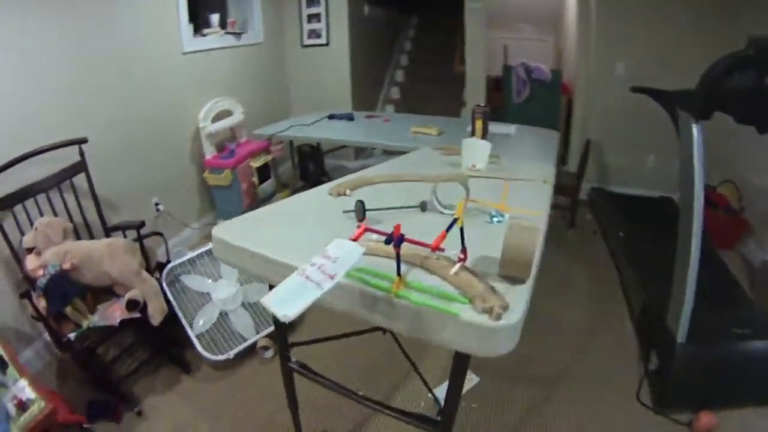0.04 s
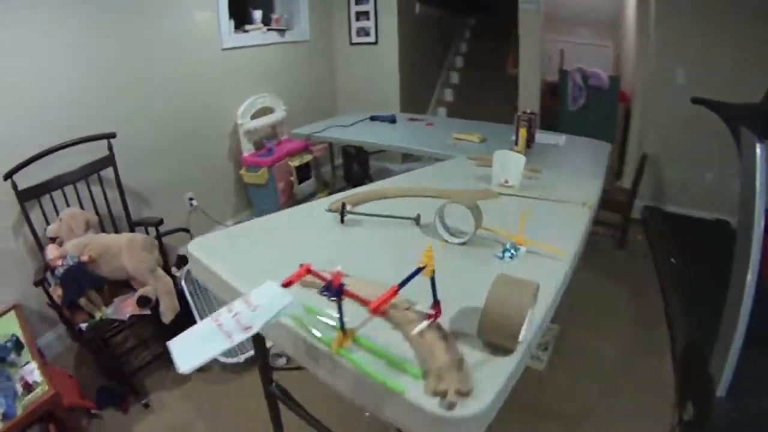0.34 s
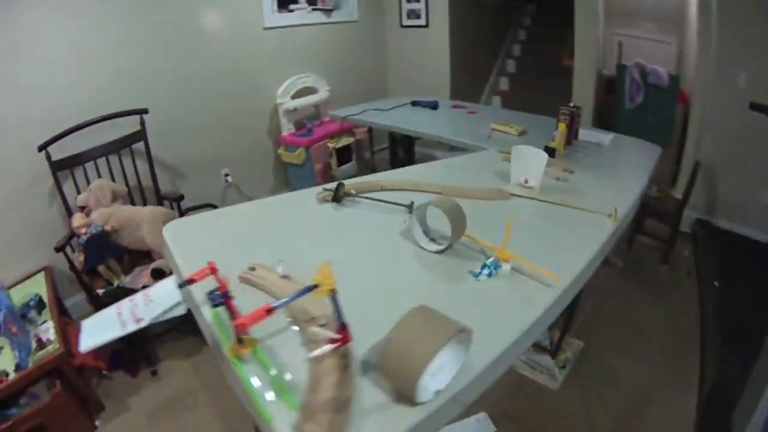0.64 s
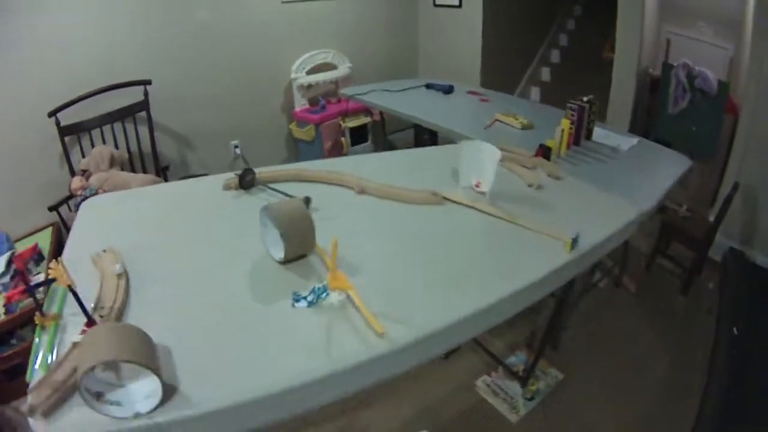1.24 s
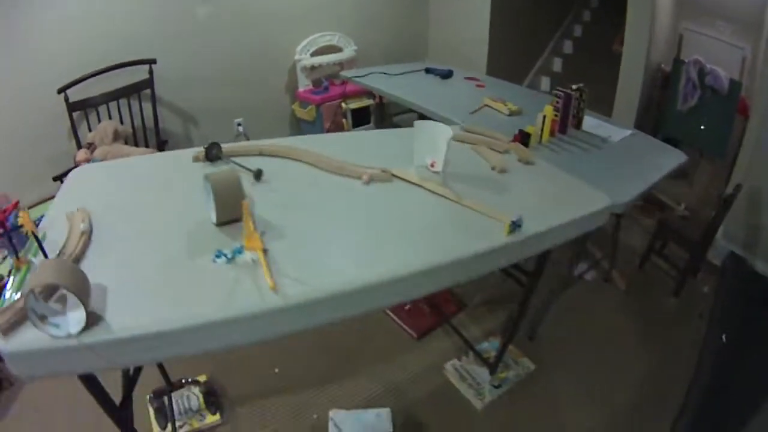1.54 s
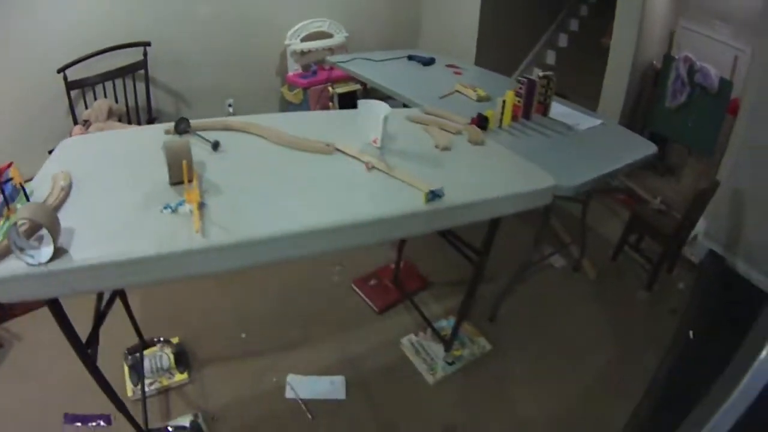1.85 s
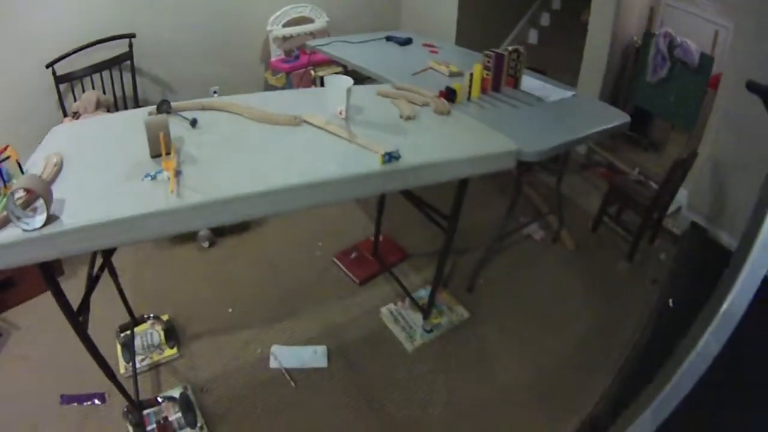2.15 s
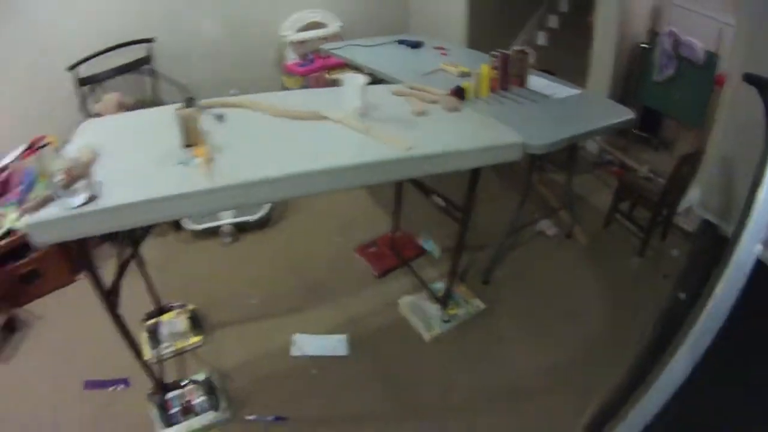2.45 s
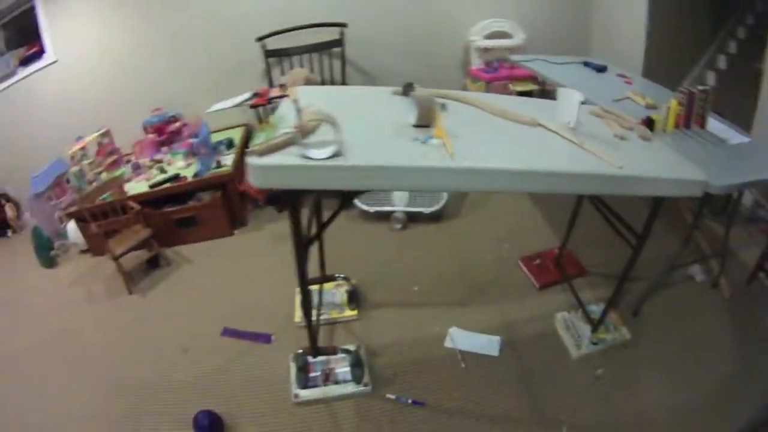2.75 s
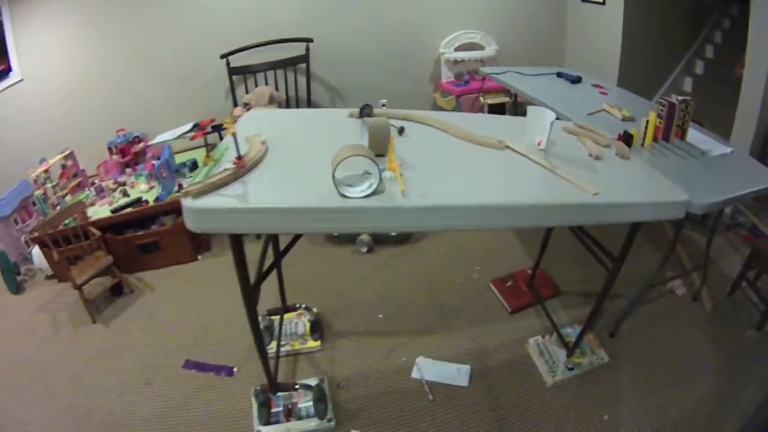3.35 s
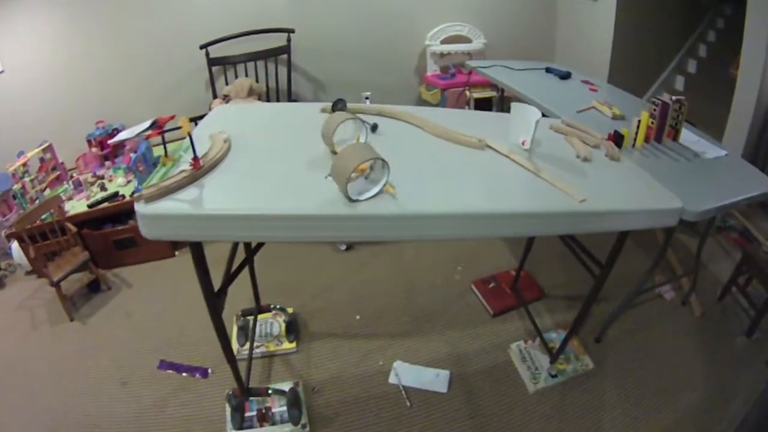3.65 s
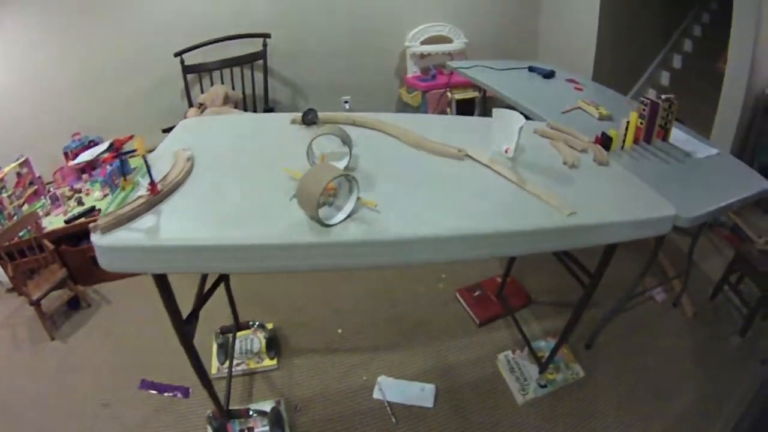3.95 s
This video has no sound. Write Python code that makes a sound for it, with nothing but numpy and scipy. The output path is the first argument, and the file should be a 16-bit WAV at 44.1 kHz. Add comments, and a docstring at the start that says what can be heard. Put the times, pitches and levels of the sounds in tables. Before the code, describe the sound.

Rolls of packing tape rumble over a hollow plastic table from the start, with many small bumps and dry ticks. At about 2.2 seconds one hits plastic sticks with a sharp click, and the rolling dies away. Soft thuds, probably footsteps, come at 2.7 and faintly at 3.2 seconds. From 3.4 seconds two rolls knock lightly together and wobble, settling near 4 seconds over a faint room hush.

```python
"""You hear rolls of packing tape rumble and bump over a hollow plastic folding table in a quiet room.
One runs into plastic sticks with a sharp click and stops; soft thuds, probably footsteps, follow.
Then one roll knocks against the other and wobbles to rest.
The rumble is countless tiny hits of a cardboard rim, which make the tabletop and the roll's core ring.
Each bump, knock, click and thud is one short blow, shaped by the thing it strikes."""
import sys
import numpy as np
from scipy import signal
from scipy.fft import rfft, irfft
from scipy.io import wavfile

SR = 44100
rng = np.random.default_rng(int(sys.argv[2]) if len(sys.argv) > 2 else 0)


def to_wav(s):
    """Save 16-bit WAV."""
    ch = np.atleast_2d(s).T  # columns
    pcm = np.round(np.clip(ch, -1, 1) * 32767)  # PCM
    wavfile.write(sys.argv[1], SR, pcm.astype(np.int16))


N = 176400  # 4 seconds

# Levels in the tables are relative: most layers add an overall gain of their own.
# three stretches of rolling: time_s, level_db, bass_db, contact_hz, contact_db
ROLL_PATH = [
    [(0.0, -28, -38, 1086, -42.5), (0.03, -35.5, -37.5, 1050, -7.5), (0.098, -31, -39.5, 1300, -12),
     (0.188, -26.5, -46, 997, 3.5), (0.232, -32, -42.5, 1130, 3), (0.312, -22, -35, 1310, -16),
     (0.326, -22, -40, 1280, -2.5), (0.354, -23.5, -28.5, 1187, -4.5), (0.404, -29.5, -41, 1325, 9),
     (0.448, -41, -28, 1215, 9), (0.456, -27.5, -38.5, 1135, -12), (0.52, -24, -36.5, 1136, 1),
     (0.562, -22, -29.5, 1020, -26), (0.596, -27.5, -31, 1037, 9), (0.66, -29.5, -51.5, 886, -5)],
    [(0.68, -26, -47, 997, 0.5), (0.71, -21.5, -42, 1034, -19), (0.76, -22, -37, 890, -3),
     (0.896, -25.5, -49.5, 1003, -10), (0.942, -25, -45.5, 1190, -7), (1.01, -23, -43.5, 920, -5),
     (1.154, -21, -46, 1310, -16.5), (1.204, -21.5, -38, 1050, -14), (1.316, -26.5, -67.5, 1116, 4),
     (1.37, -28.5, -51, 1375, 9.5), (1.464, -39.5, -67.5, 1520, 6.5), (1.476, -22, -71, 1390, -5.5),
     (1.724, -25.5, -41, 1110, 5), (1.788, -37.5, -33, 1160, 6), (1.798, -59, -40, 1050, -2)],
    [(1.8, -17.5, -40, 1350, -6.5), (1.816, -20, -53, 1370, -21.5), (1.858, -28.5, -41, 1046, 8.5),
     (1.892, -29, -52, 1010, 4), (1.918, -23, -32.5, 985, -1.5), (1.978, -28, -51, 850, 4.5),
     (2.018, -29.5, -50, 1040, -6), (2.066, -24, -55, 923, -5), (2.12, -29.5, -68, 980, 6),
     (2.202, -27, -62, 1400, -3.5), (2.27, -29.5, -39.5, 996, 2), (2.298, -25, -43, 904, -1),
     (2.346, -40, -55, 970, 6.5), (2.416, -53.5, -57, 1003, -4.5), (2.46, -58, -75, 1143, -1)],
]
# the hollow note of the cardboard core: time_s, level_db, pitch_hz
CORE_NOTE = [(1.021, -45, 1156), (1.079, -35, 1180), (1.25, -37, 1230), (1.41, -37.5, 1380),
             (1.46, -29.5, 1360), (1.57, -37.5, 1265), (1.63, -29.5, 1025), (1.709, -27, 995),
             (1.779, -44.5, 893), (1.89, -32.5, 944), (1.959, -32, 930), (2.031, -63, 857)]
# the rim bumping the table: start_s, level_db, contact_hz, contact_db, tick_db
RIM_BUMPS = [(0.062, -23.5, 925, -17, -57), (0.091, -21.5, 1370, 7, -53), (0.12, -17.5, 950, 8, -65),
             (0.149, -25, 1380, 8, -70), (0.179, -37, 1000, 10, -74), (0.205, -24.5, 1170, 5, -58),
             (0.234, -27.5, 939, 14.5, -42.5), (0.257, -19.5, 965, 11, -50), (0.281, -17, 1270, 9, -50),
             (0.326, -15.5, 1390, 13, -37), (0.344, -36.5, 1270, -9.5, -68), (0.372, -15.5, 980, -15, -61),
             (0.39, -19, 670, -15, -40), (0.435, -18.5, 1450, 2, -42), (0.453, -11, 1200, 1, -52),
             (0.459, -14.5, 1220, -16.5, -48), (0.478, -13.5, 1260, -5, -49), (0.556, -13.5, 850, 4, -50),
             (0.579, -20, 972, -4, -44), (0.802, -20.5, 708, -13, -54), (0.935, -17.5, 1330, -23, -46.5),
             (1.137, -15, 1640, 0.5, -40.5), (1.317, -17.5, 730, -1, -37),
             (1.407, -13.5, 1460, 19.5, -33.5), (1.439, -11, 1354, 40.5, -34), (1.464, -23, 1390, 8.5, -50),
             (1.657, -20.5, 1020, 11, -39.5), (1.692, -24, 1010, 1, -54), (1.707, -28, 960, 14, -43.5),
             (1.801, -17.5, 1550, 7, -34), (1.818, -11, 1580, 5, -42.5), (1.981, -18, 894, 1, -67),
             (2.041, -20.5, 910, 12, -63), (2.18, -20.5, 1490, 12, -49), (2.187, -18.5, 1440, 0, -41),
             (2.207, -20, 1530, -7, -56), (2.225, -20, 870, 5, -52)]
# roll knocking against roll: start_s, level_db, contact_hz
ROLL_KNOCKS = [(3.446, -26, 1500), (3.458, -27.5, 1700), (3.47, -26, 930), (3.515, -22, 660),
               (3.524, -25, 1000), (3.554, -25, 670), (3.587, -27.5, 657), (3.624, -29, 675),
               (3.65, -28.5, 1090), (3.661, -27, 1150), (3.698, -33, 890), (3.753, -22, 680),
               (3.781, -29, 640), (3.812, -54, 660)]
# the rolls rocking and rubbing after they meet: time_s, level_db
ROCKING_LEVELS = [(3.443, -30), (3.512, -44), (3.519, -31), (3.57, -44.5), (3.748, -41), (3.752, -45.5),
                  (4.0, -52)]
RUB_LEVELS = [(3.45, -70), (3.55, -77), (3.8, -91), (3.91, -59), (4.0, -62)]
# bright ticks of the rolls bumping and knocking, and plastic sticks struck near 2.2 s:
# start_s, level_db, snap_hz
SHARP_CLICKS = [(0.22, -50, 4400), (0.236, -48, 4300), (0.942, -56, 8500), (1.303, -52.5, 9500),
                (1.442, -50, 4020), (1.753, -44, 3580), (1.801, -43, 3920), (2.1891, -26.5, 6300),
                (2.202, -42, 7400), (2.207, -38, 4900), (2.2787, -38.5, 5240), (2.309, -52, 4600),
                (3.4476, -48, 4300), (3.6588, -54.5, 9100)]
# soft thuds: start_s, level_db, slap_db, boom_top_hz
SOFT_THUDS = [(2.670, -24, 0, 900), (2.679, -27, 2.5, 800), (2.717, -18, 3, 900), (3.174, -32.5, -11, 393)]

# the notes (modes) a struck thing rings with, and their time to fade 60 dB: pitch_hz, level_db, fade_s
TABLE_MODES = [(216, -11.5, 0.35), (248, -5, .11), (504, -15.5, 0.024), (558.7, -6.5, 0.12),
               (680.5, 0.5, 0.14), (921.5, -2, 0.091), (1050, -5, .04), (1223, 0.5, .14),
               (1242, -14.5, 0.063), (1380, -3, 0.14), (1502, -11, 0.25)]
CLICK_MODES = [(4750, -6, .17), (4850, -3, .17), (4930, 2.5, .18), (5080, -1, .17), (5200, -10, .13),
               (5997, -9, .13), (6400, -8.5, .11), (6551, -7.5, .12), (6780, -3, .12), (7811, -15.5, .06)]
THUD_MODES = [(251, 1, 0.16), (328, -5, 0.12), (437, -5, 0.11), (546, -7, 0.13)]

# how strong each sound is from low to high: pitch_hz, level_db
TABLETOP_TONE = [(30, -50), (100, -49.5), (200, -15), (330, -15), (460, -1), (680, -3), (920, -1),
                 (1250, -3.5), (1580, -1.5), (1960, -6.5), (2400, -22), (3050, -37), (3700, -48.5),
                 (4300, -43), (5200, -67), (8000, -76), (15000, -77.5), (20000, -74)]
RUMBLE_TONE = [(50, -34), (110, -34), (200, -3), (260, -5.5), (380, -6.5), (600, -41), (1500, -11.5),
               (6000, -70)]
RIM_SCRAPE_TONE = [(100, -61.5), (1500, -27.5), (2600, 14.5), (3600, 1), (4250, 2.5), (4700, -17.5),
                   (5200, -7.5), (8000, -19), (15000, -32.5)]
DRY_TICK_TONE = [(100, -77.5), (1200, -33), (1900, 26.5), (2400, 10.5), (3000, 2.5), (3700, -6.5),
                 (4300, -6), (5200, -23.5), (8000, -29.5), (15000, -41)]
WOBBLE_TONE = [(30, -63), (70, -23), (130, -27), (210, -3), (350, -18.5), (470, -3.5), (650, -4.5),
               (800, -8), (1100, -4), (1900, -16.5), (2500, -31.5), (4000, -45.5), (8000, -60),
               (16000, -70)]
SNAP_TONE = [(50, -71), (800, -32), (2500, 0), (4000, 0), (5000, -0.5), (6700, -4.5), (7700, -12),
             (11000, -11.5), (12000, -22.5), (13400, -10), (14500, -23.5)]
THUD_BOOM_TONE = [(20, -60), (40, -49), (120, -29), (190, -0.5), (250, 1.5), (330, 1), (440, 5), (550, 3.5),
                  (680, -8.5), (900, -32), (3000, -55), (9000, -88)]
THUD_SLAP_TONE = [(30, -52), (200, -37), (700, 5), (1100, 8), (1550, 10.5), (2000, -3), (2600, -37),
                  (5000, -55), (12000, -72)]
ROOM_NOISE_TONE = [(20, -47.5), (50, -30), (80, -26.5), (105, -8.5), (150, -8.5), (200, -10), (330, -1.5),
                   (480, -7), (750, -6.5), (1100, -9.5), (1500, -7), (1900, -15), (2400, -24.5),
                   (3100, -28.5), (4200, -31), (7000, -32.5), (11000, -35), (15000, -36)]
# how long the room's echo takes to fade 60 dB: pitch_hz, fade_s
ECHO_FADES = [(150, 0.5), (400, 0.37), (1000, 0.13), (2500, 0.21), (6000, 0.22), (14000, 0.23)]

HIT_S = 0.25  # length of one hit
TIME = np.arange(N) / SR


def rolling():
    """Tiny hits shake the tabletop; the uneven rim adds a low rumble, a stiffer contact a fine scrape."""
    times, *columns = np.vstack(ROLL_PATH).T
    db, bass_db, hz, contact_db = (np.interp(TIME, times, column) for column in columns)
    body = tabletop(grains(), TABLETOP_TONE, hz, contact_db, moving=True) * amp(db - 5)
    rumble = unit(colour(grains(), RUMBLE_TONE)) * amp(bass_db - 8.5)
    stiffness_db = 11 * np.log2(hz / hz.mean())  # a higher contact note scrapes louder
    scrape = unit(colour(grains(), RIM_SCRAPE_TONE)) * amp(db + stiffness_db - 38.5)
    return (body + rumble + scrape) * (TIME < times[-1])


def tabletop(force, tone, contact_hz, contact_db, width_hz=1065, moving=False):
    """The table answers a force with a broad sound, a note from the springy contact and its own ring."""
    body = unit(colour(force, tone))
    contact = resonate(resonate(body, contact_hz, width_hz), contact_hz, width_hz)
    # the ring keeps changing under a moving roll
    ringing = drift(body, lambda x: ring(x, TABLE_MODES)) if moving else ring(body, TABLE_MODES)
    return unit(body + amp(contact_db) * unit(contact) + amp(-5) * unit(ringing))


def grains(per_second=1800, clump_hz=41.3):
    """A cardboard rim makes countless tiny hits on a textured surface, in slight clumps."""
    sizes = amp(1.5 * np.minimum(rng.exponential(1, N), 4))
    hz = np.fft.rfftfreq(N, 1 / SR)
    clumps = unit(irfft(rfft(rng.standard_normal(N)) * hz * np.exp(-hz / clump_hz), N))
    hits = rng.choice([-1, 1], N) * (rng.random(N) < per_second / SR)
    return unit(sizes * amp(0.22 * clumps) * hits)


def cardboard_core(width_hz=190):
    """Tiny hits sound the hollow core, whose note rises a little, then sinks as the roll slows."""
    times, db, hz = np.transpose(CORE_NOTE)
    hz = np.interp(TIME, times, hz)
    note = resonate(resonate(grains(), hz, width_hz), hz, width_hz)
    return unit(note) * amp(np.interp(TIME, times, db) - 1) * fade(times)


def rim_bumps():
    """Flat spots and edges of the rim strike the table, each with a small dry tick."""
    out = np.zeros(N)
    for start, db, hz, contact_db, tick_db in RIM_BUMPS:
        bump = tabletop(blow(scatter_s=0.0085, scatter_db=8.5), TABLETOP_TONE, hz, contact_db)
        tick = colour(blow(scatter_s=0.0064, scatter_db=37), DRY_TICK_TONE)
        add(out, start, db - 10, bump)
        add(out, start, tick_db + 0.5, tick)
    return out


def wobble():
    """The rolls rock on the table and knock together with faint cardboard ticks."""
    times, levels = np.transpose(ROCKING_LEVELS)
    out = unit(colour(grains(), WOBBLE_TONE)) * amp(np.interp(TIME, times, levels) - 4) * fade(times)
    for start, db, hz in ROLL_KNOCKS:
        force = blow(scatter_s=0.011, scatter_db=28)
        knock = tabletop(force, WOBBLE_TONE, hz, contact_db=2.5, width_hz=670)
        tick = colour(blow(scatter_s=0.0088, scatter_db=19), RIM_SCRAPE_TONE)
        add(out, start, db - 9.5, knock)
        add(out, start, db - 55.5, tick)
    return out


def sharp_clicks():
    """Bright snaps that ring briefly: the rolls bump and knock, and strike plastic sticks near 2.2 s."""
    out = np.zeros(N)
    for start, db, hz in SHARP_CLICKS:
        snap = unit(colour(blow(scatter_s=0.0022, scatter_db=8.5), SNAP_TONE))
        snap = unit(snap + amp(5) * unit(resonate(snap, hz, width_hz=1500)))
        ringing = unit(ring(signal.unit_impulse(len(snap)), CLICK_MODES))
        add(out, start, db - 13.5, snap + amp(-11) * ringing)
    return out


def soft_thuds():
    """A padded blow makes a hollow boom, rounder when it lands softly, with a short slap on top."""
    out = np.zeros(N)
    for start, db, slap_db, top_hz in SOFT_THUDS:
        boom = unit(colour(blow(scatter_s=0.019, scatter_db=-5.5), THUD_BOOM_TONE))
        ringing = unit(ring(signal.unit_impulse(len(boom)), THUD_MODES))
        muffle = signal.butter(3, top_hz, fs=SR, output="sos")
        boom = unit(signal.sosfilt(muffle, boom + amp(-3) * ringing))
        slap = unit(colour(blow(scatter_s=0.0022, scatter_db=-2), THUD_SLAP_TONE))
        add(out, start, db - 7, boom + amp(slap_db - 13.5) * slap)
    return out


def tape_rub():
    """Tape slides lightly on tape as the rolls settle."""
    times, db = np.transpose(RUB_LEVELS)
    return unit(colour(grains(), DRY_TICK_TONE)) * amp(np.interp(TIME, times, db)) * fade(times)


def room_echo(x, per_second=3000, delay_s=0.005):
    """Sound bounces around a furnished room; the low notes linger longest."""
    bounces = rng.choice([-1., 1.], SR // 2) * (rng.random(SR // 2) < per_second / SR)
    hz, t, bands = signal.stft(bounces, SR, nperseg=256)
    tail = signal.istft(bands * amp(-60 * t / look_up(ECHO_FADES, hz)[:, None]), SR)[1]
    tail = np.r_[np.zeros(round(delay_s * SR)), tail / np.linalg.norm(tail)]
    return amp(-5) * signal.fftconvolve(x, tail)[:N]


def room_noise(hum_hz=122.5):
    """The room has a steady hush and a faint electrical hum."""
    gains = amp(look_up(ROOM_NOISE_TONE, np.fft.rfftfreq(N, 1 / SR)))
    hush = unit(irfft(rfft(rng.standard_normal(N)) * gains, N))
    hum = unit(np.sin(2 * np.pi * hum_hz * TIME))
    return amp(-54) * hush + amp(-71.5) * hum


def blow(scatter_s, scatter_db):
    """One sharp push, followed by waves scattering inside the struck thing."""
    t = np.arange(round(HIT_S * SR)) / SR
    waves = rng.standard_normal(len(t)) * np.exp(-t / scatter_s)
    return (t == 0) + amp(scatter_db) * waves / np.linalg.norm(waves)


def ring(x, modes):
    """Makes x ring with an object's own fading notes."""
    t = np.arange(round(HIT_S * SR)) / SR
    notes = sum(amp(db - 60 * t / fade_s) * np.sin(2 * np.pi * (hz * t + rng.random()))
                for hz, db, fade_s in modes)
    notes *= 1 - np.exp(-t * modes[0][0])  # swells over about one cycle of the lowest note
    return signal.fftconvolve(x, notes / np.linalg.norm(notes))[:len(x)]


def resonate(x, hz, width_hz):
    """Keeps the part of x near one pitch, which may be steady or moving."""
    turn = np.exp(2j * np.pi * np.cumsum(hz * np.ones(len(x))) / SR)
    decay = np.exp(-np.pi * width_hz / SR)
    return 2 * (turn * signal.lfilter([1 - decay], [1, -decay], x / turn)).real


def colour(x, tone, size=4096):
    """Shapes the lows and highs of x to follow a tone table."""
    log_gain = np.log(amp(look_up(tone, abs(np.fft.fftfreq(size, 1 / SR)))))
    spectrum = np.exp(np.conj(signal.hilbert(log_gain)))  # so nothing sounds ahead of a hit
    taps = np.fft.ifft(spectrum).real[:size // 2]
    return signal.fftconvolve(x, taps / np.linalg.norm(taps))[:len(x)]


def drift(x, respond, step_s=0.09):
    """Movement: x wanders between four random versions of a ring or echo, keeping its power."""
    paths = rng.standard_normal((4, 200))
    shares = np.array([np.interp(TIME / step_s, np.arange(len(path)), path) for path in paths])
    return sum(respond(x * share) for share in shares / np.linalg.norm(shares, axis=0))


def add(mix, start_s, db, sound):
    """Mixes in a hit so that its first 10 ms have the given level."""
    part = mix[round(start_s * SR):][:len(sound)]
    part += amp(db) * sound[:len(part)] / np.std(sound[:round(0.01 * SR)])


def fade(times, fade_s=0.0078):
    """Eases a sound in at its first time and out at its last."""
    to_edge_s = np.minimum(TIME - times[0], times[-1] - TIME)
    return np.sin(np.pi / 2 * np.clip(to_edge_s / fade_s, 0, 1)) ** 2


def look_up(table, hz):
    """Reads between a table's rows, with octaves evenly spaced."""
    pitches, values = np.transpose(table)
    return np.interp(np.log(hz + 1), np.log(pitches + 1), values)


def amp(db):
    """Turns decibels into a gain."""
    return 10 ** (np.asarray(db) / 20)


def unit(x):
    """Scales x to an average (rms) level of 1."""
    return x / np.sqrt(np.mean(x ** 2) + 1e-20)


def scene():
    """Everything in the room, heard by one moving microphone."""
    direct = rolling() + cardboard_core() + rim_bumps() + wobble()
    direct += tape_rub() + sharp_clicks() + soft_thuds()
    return (direct + drift(direct, room_echo) + room_noise())[None]


def record(dry):
    """Cuts off the very highest treble."""
    treble_cut = signal.firwin(511, cutoff=15300, window=("kaiser", 9), fs=SR)
    return signal.oaconvolve(dry, treble_cut[None], "same")


dry = scene()
out = record(dry)
to_wav(out)
```